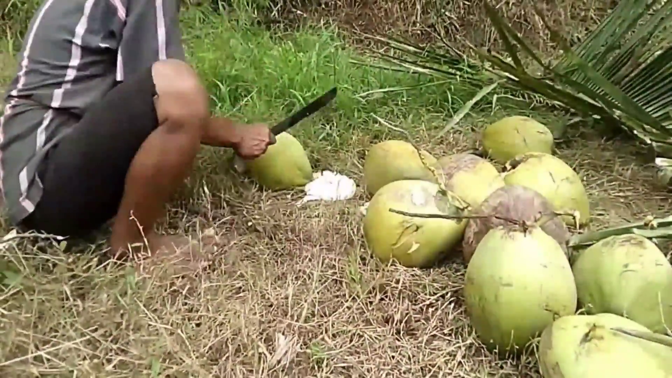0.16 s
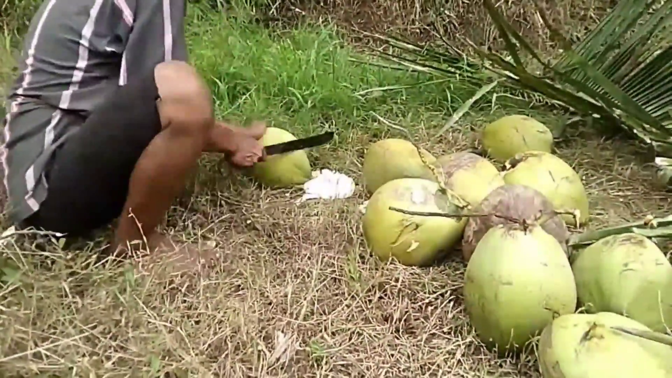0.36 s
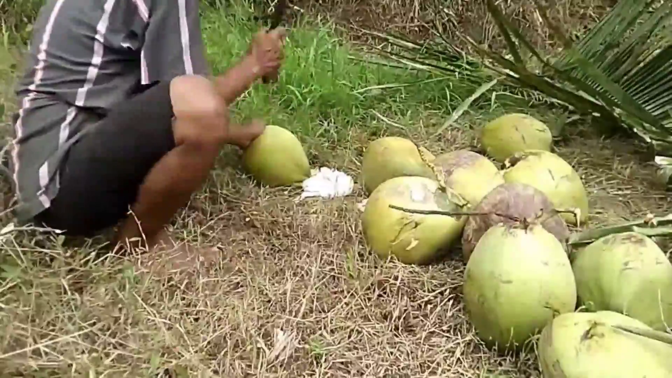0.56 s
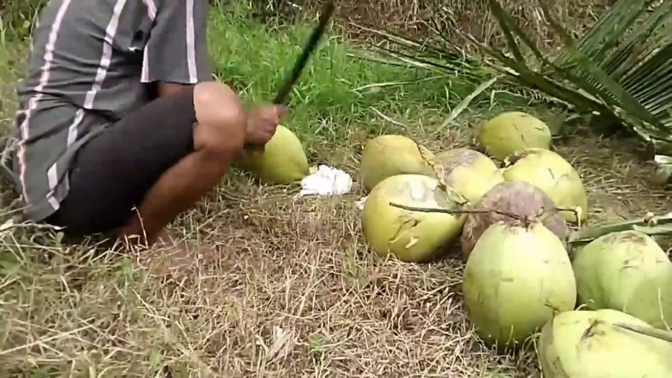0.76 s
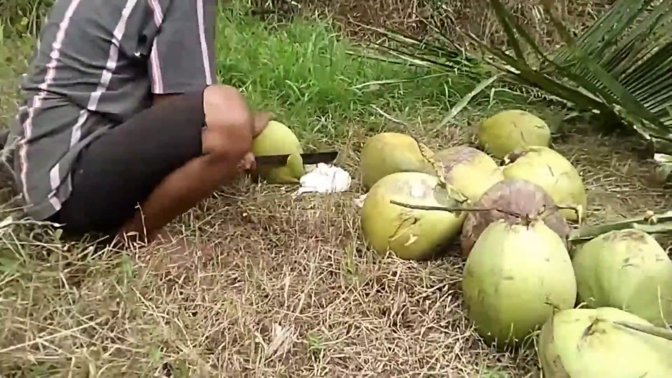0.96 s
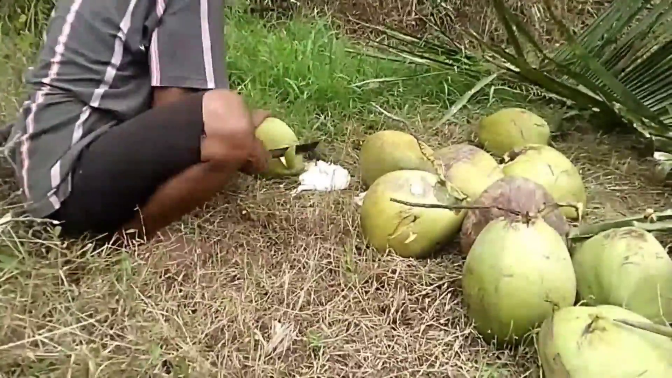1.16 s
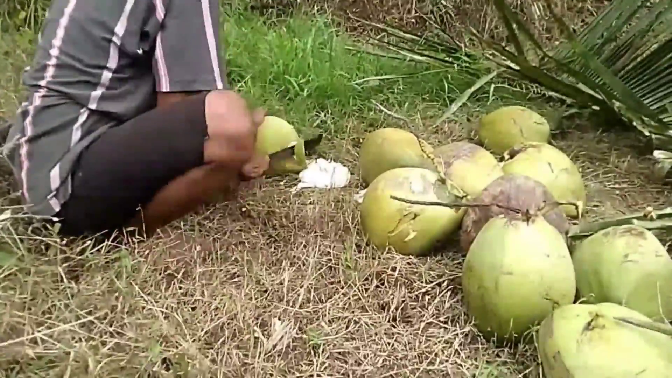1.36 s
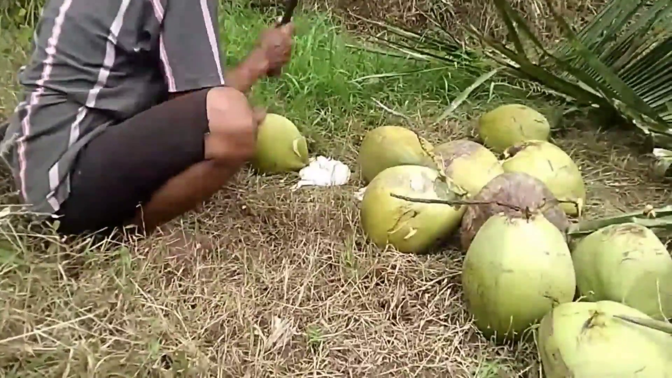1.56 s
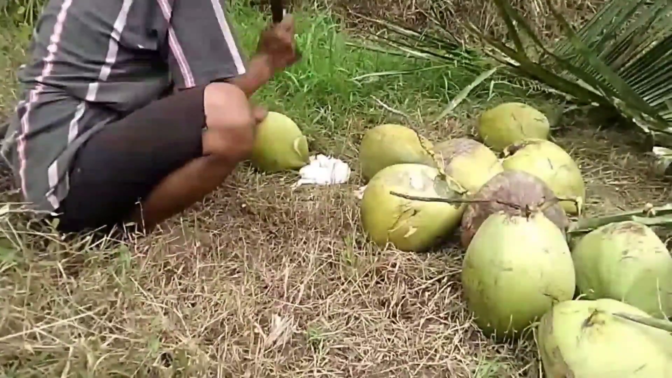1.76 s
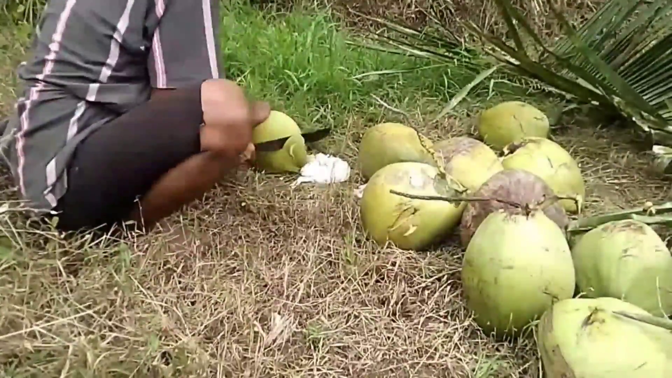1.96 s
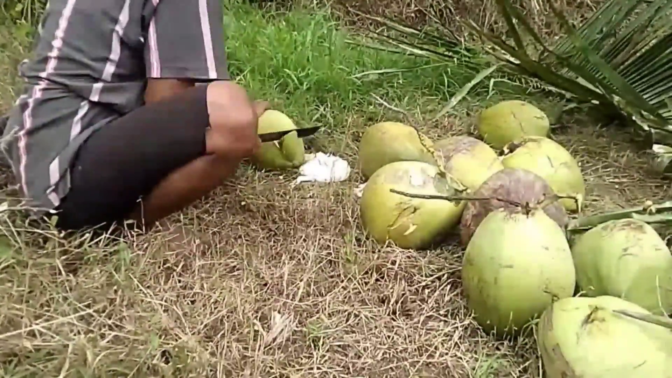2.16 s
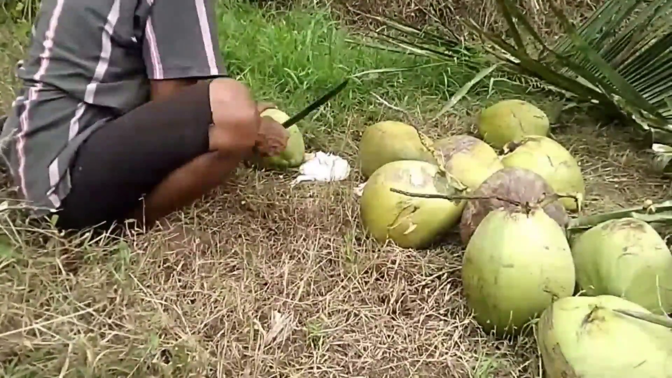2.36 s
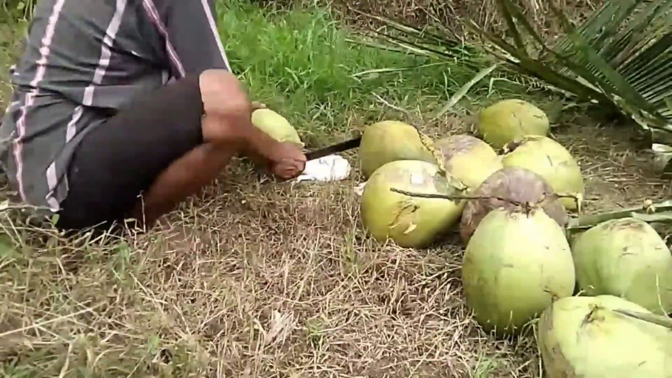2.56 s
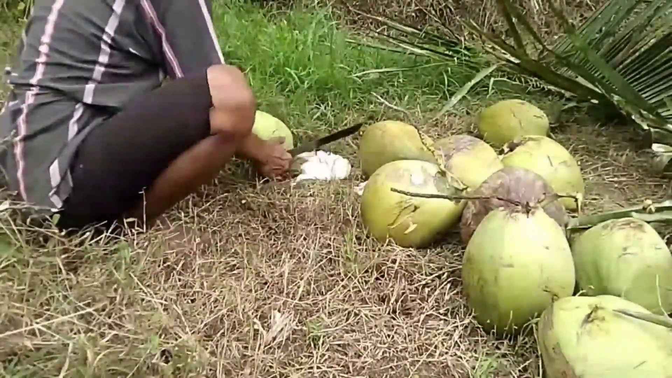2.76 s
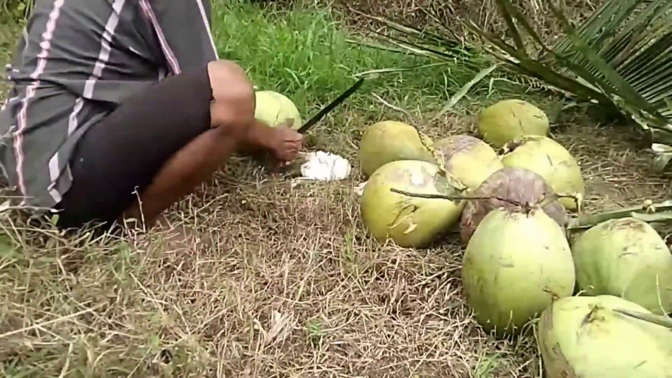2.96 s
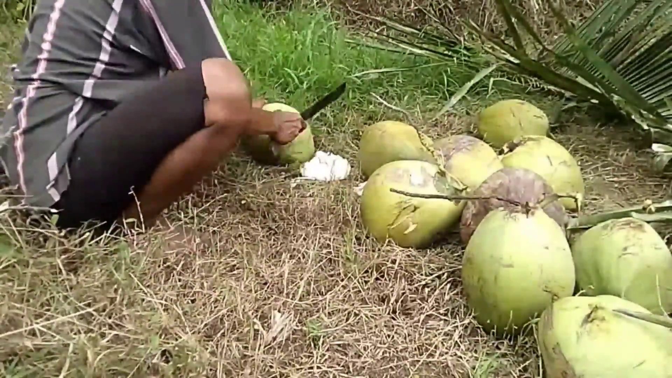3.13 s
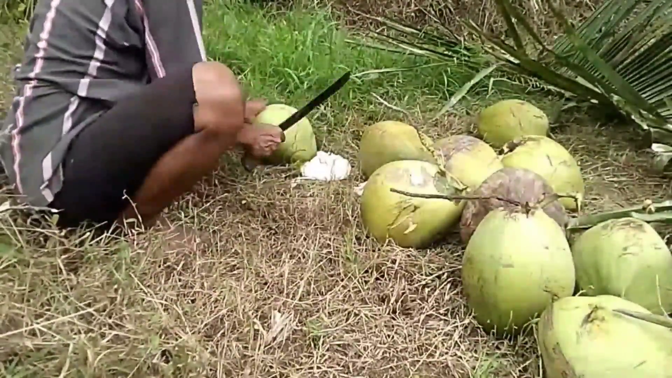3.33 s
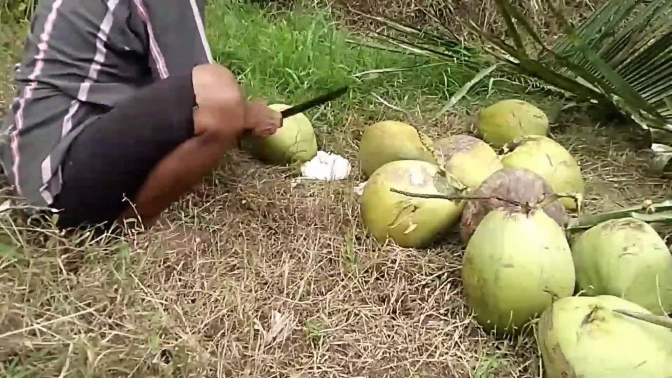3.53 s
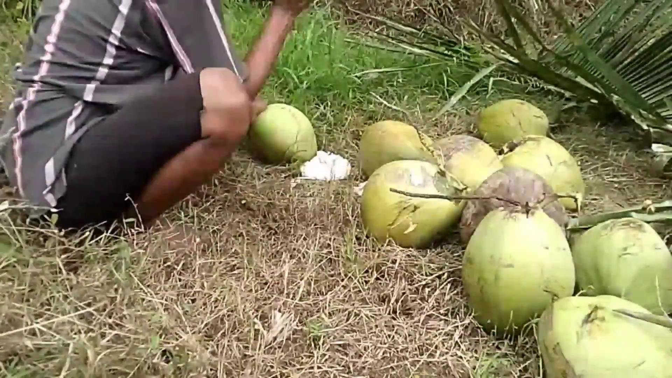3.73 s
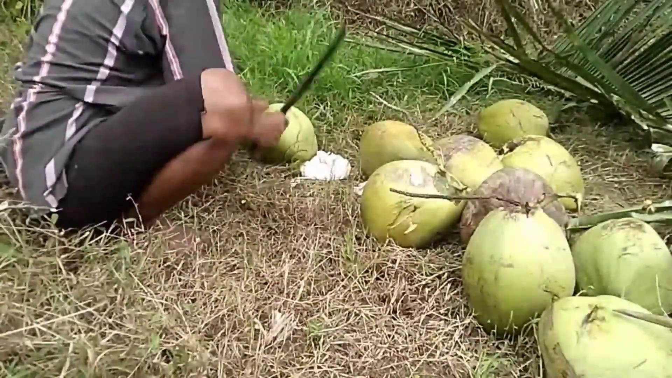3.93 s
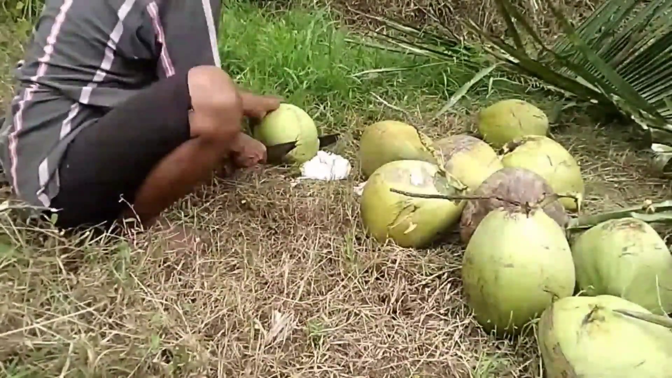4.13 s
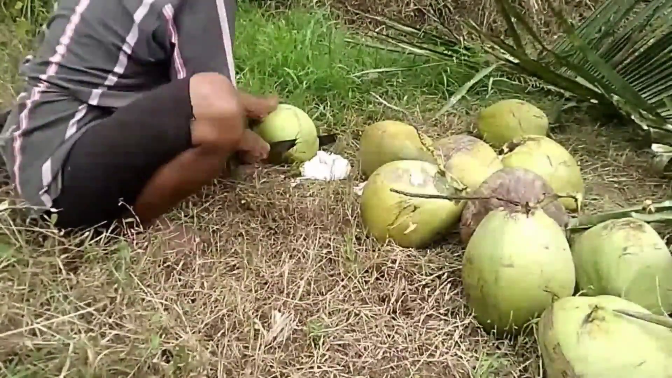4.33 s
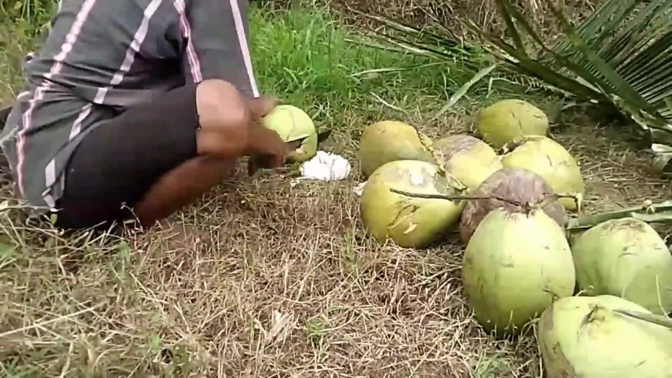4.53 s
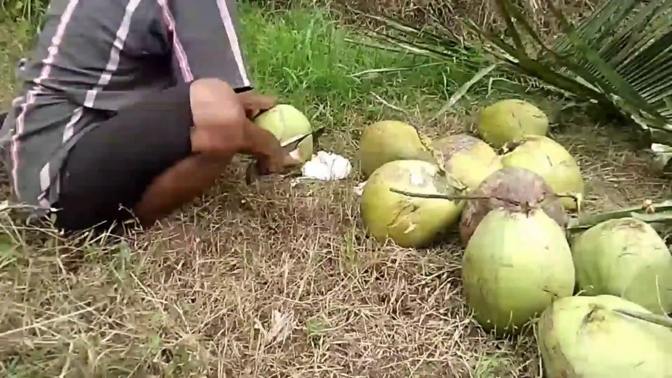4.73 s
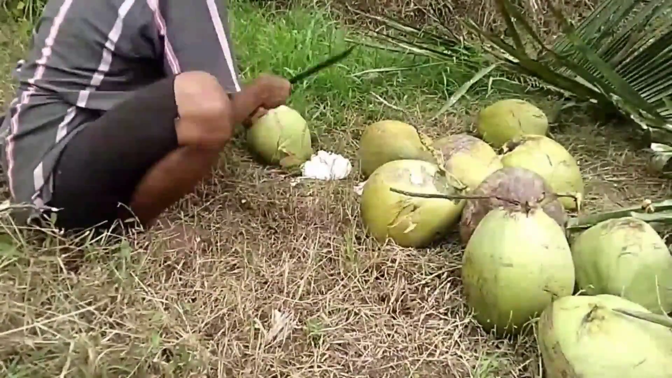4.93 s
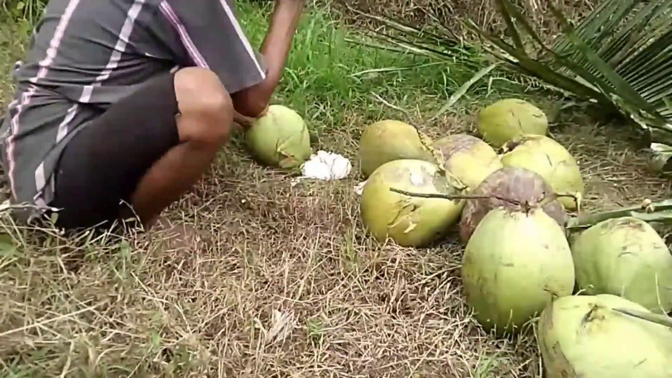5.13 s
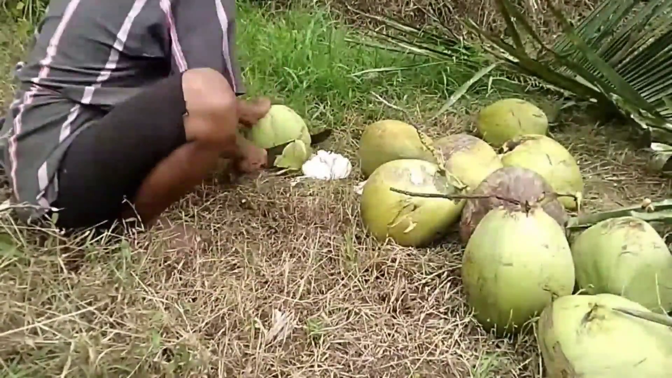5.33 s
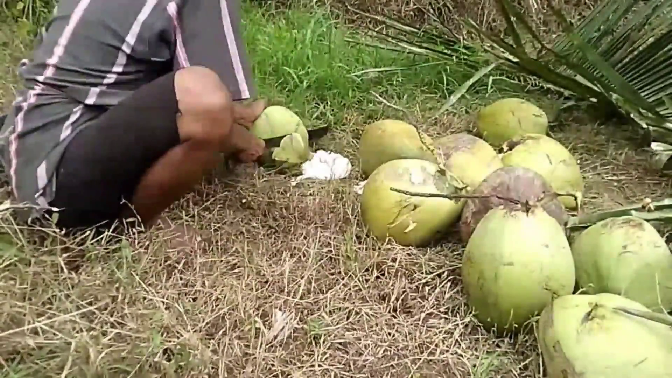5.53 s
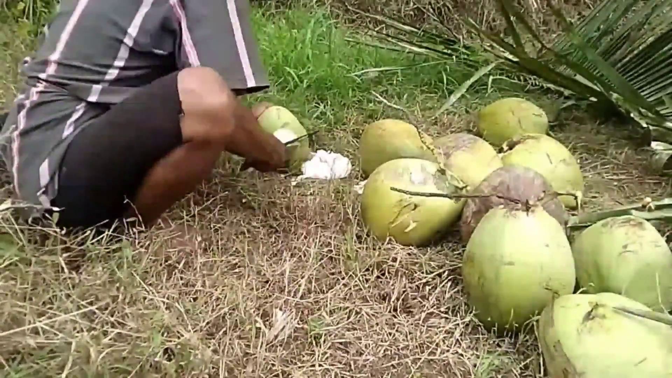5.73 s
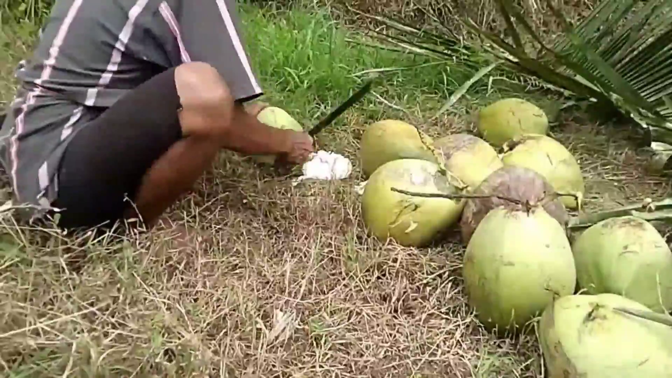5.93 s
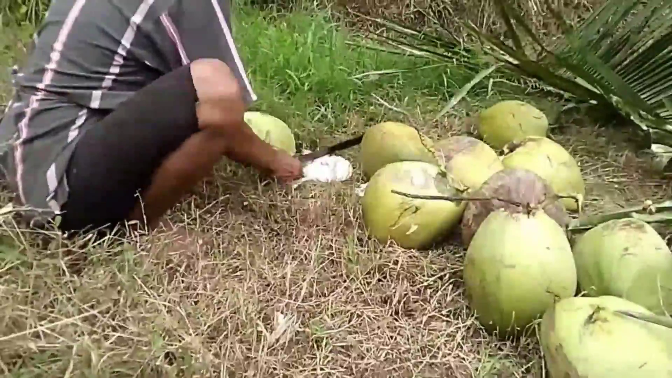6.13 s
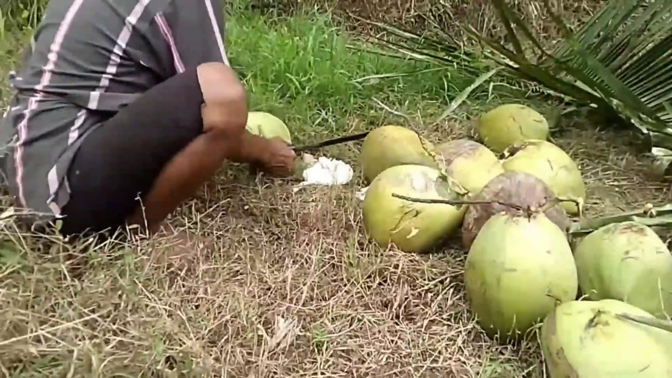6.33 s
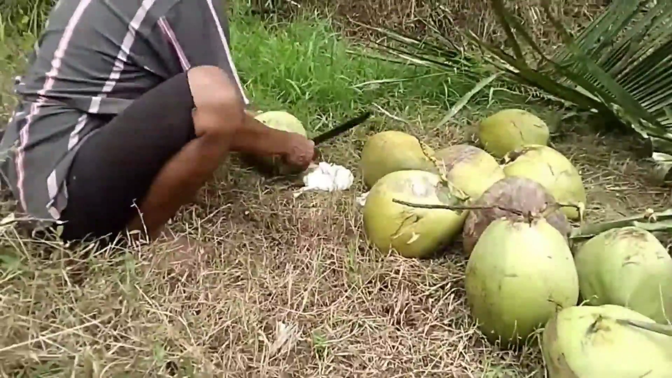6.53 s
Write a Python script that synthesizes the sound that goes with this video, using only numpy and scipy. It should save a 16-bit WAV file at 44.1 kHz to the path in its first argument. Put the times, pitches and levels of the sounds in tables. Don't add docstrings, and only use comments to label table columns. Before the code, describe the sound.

A quiet grassy outdoor place: faint leaf hiss, low wind rumble with small gusts, very high thin insects whining and briefly trilling. A distant bird whistles at 0.3 s. At 0.45 a light blade tap knocks the coconut; at 0.96 a firm chop lands, a dull hollow thud with a bright crack and short crunch, followed by fine tearing around 1.25. Another strong chop hits at 2.0, then fibres rip and snap at 2.3. Fingers bump the nut hollowly around 2.55 to 3.0, with two soft bird notes near 2.8 and gusts till 3.3. A soft blow comes at 3.6, the hardest at 4.1. Around 4.5 to 4.7 the husk is prised, crackling, with a sharp snap at 4.63 and a creak. A small tap at 5.1 precedes the last chop at 5.44, brief tearing at 5.8, a rising whistle at 5.9, and faint taps by 6.4.

```python
import sys
import numpy as np
from scipy import signal
from scipy.fft import rfft, irfft, next_fast_len
from scipy.io import wavfile
from scipy.ndimage import uniform_filter1d

SR = 44100
rng = np.random.default_rng(int(sys.argv[2]) if len(sys.argv) > 2 else 0)


def boost(x):
    u = np.asarray(x, float) / 20
    return 10 ** u


def dump(signal):
    limited = np.clip(np.atleast_2d(signal).T, -1, 1)
    pcm = np.round(limited * 32767).astype(np.int16)
    wavfile.write(sys.argv[1], SR, pcm)


N = 290619

# f/Hz, density/dB per Hz
FIELD_SPECTRUM = [(300, -6), (555, -30.5), (645, -21.5), (1060, -30), (1430, -23), (3000, -25.5),
                  (4100, -26.5), (4700, -20.5), (5900, -21), (7000, -14.5), (10500, -5.5), (13600, -8.5),
                  (15500, -1), (15900, -40.5)]
# t/s, level/dB
FIELD_LEVEL = [(0.0, -62), (0.1, -61.5), (0.3, -66), (1.2, -65), (2.6, -68.5), (2.95, -66), (3.9, -71.5),
               (4.6, -69), (5.4, -71), (6.59, -71)]
# f/Hz, L-R/dB
FIELD_BALANCE = [(60, -18), (110, 9.5), (200, 13), (380, 15), (700, 24), (1290, 16.5), (2380, 26),
                 (4400, 26), (8120, 5), (15000, -0.5)]
# f/Hz, width/Hz, level/dB
CHORUS = [(3465, 180, -74), (4664, 160, -80), (6890, 100, -80.5)]
# f/Hz, density/dB per Hz
RUMBLE_SPECTRUM = [(12, -15), (20, -12.5), (48, -6.5), (123, -1.5), (159, -2), (177, -10.5), (226, -14),
                   (367, -43), (500, -30), (650, -69.5), (1100, -120)]
# t/s, level/dB
WIND_LEVEL = [(0, -68), (.25, -65), (.6, -62.5), (1, -65.5), (1.9, -70), (2.7, -62), (3.05, -62.5),
              (3.28, -57.5), (3.5, -64.5), (4.2, -63.5), (4.6, -66.5), (5, -67.5), (6, -68), (6.59, -65.5)]
# t/s, hold/s, level/dB
GUSTS = [(0.543, 0.012, -58), (0.953, 0.4, -61), (1.567, 0.09, -58.5), (1.983, 0.036, -54.5),
         (2.37, 0.035, -55.5), (2.695, .02, -50.5), (3.185, 0.075, -52), (3.714, 0.09, -71),
         (4.043, 0.039, -67), (4.68, 0.12, -60), (5.463, 0.016, -63), (6.23, .03, -69.5)]
GUST_RISE_DB_PER_S, GUST_FALL_DB_PER_S, CALM_DB = 162, 138, -93.5

# top t/s, period/s, share rising, middle f/Hz, later sink/Hz
WHINES = [(.39, 1.022, .37, 13935, 125), (.63, 1.115, .55, 13950, 0), (.4, 1.055, .45, 13715, 185),
          (.37, 1.035, .45, 13200, 0)]
# first level/dB, last level/dB, fading depth/dB
WHINE_LEVELS = [(-59, -69, 3), (-64, -68, 2.5), (-69, -77, 4), (-82, -77, 4)]
SLIDE_HZ, SINK_S, SINK_LENGTH_S = 80, 3.1, 0.5
SWARM_HZ = [14270, 14180, 14420, 13550, 13750]
SWARM_DB = -77.5
# t/s, hold/s, level/dB
TRILLS = [(1.67, 0.14, -72), (1.943, 0.073, -71), (2.384, 0.0099, -64), (4.236, 0.077, -69.5)]
TRILL_HZ, TRILL_PER_S = 7950, 250
# t/s, hold/s, first f/Hz, last f/Hz, level/dB
WHISTLES = [
    (.31, 0.14, 3273, 3163, -63),
    (2.8, .085, 3343, 3363, -64),
    (2.907, 0.099, 3340, 3324, -58.5),
    (5.926, 0.15, 3270, 3500, -65.5),
]

# t/s, level/dB, f/Hz, t60/s
TAPS = [(0.114, -52.5, 1430, 0.049), (2.544, -49.5, 495, 0.14), (2.655, -42.5, 820, 0.27),
        (2.663, -49, 1670, 0.31), (2.665, -46, 2360, 0.061), (2.699, -46, 90, 0.044),
        (2.704, -44, 1380, 0.013), (2.806, -44.5, 650, 0.24), (2.813, -49, 1230, 0.17),
        (2.983, -51.5, 754, 0.5), (5.09, -60, 1080, 0.02), (5.097, -45.5, 1230, 0.052),
        (5.114, -50.5, 1180, 0.079), (4.25, -53, 980, 0.81), (6.33, -64, 620, 0.56),
        (6.44, -59.5, 667, 0.57)]
# t/s, then low, middle, main and upper ring level/dB
KNOCKS = [
    (0.4422, -33, -38, -73, -65),
    (0.9577, -24.5, -23.5, -21, -43),
    (2.0018, -27.5, -26.5, -11, -31.5),
    (3.595, -60, -35, -60.5, -52.5),
    (4.0904, -27.5, -20.5, -6.5, -23),
    (4.653, -43.5, -43, -68.5, -53),
    (4.689, -51, -38.5, -56, -65),
    (5.433, -27, -23, -12.5, -42),
]
# f/Hz, level/dB, t60/s
NUT_MODES = [
    [(138.5, -17.5, 0.037), (222, -5.5, 0.043), (294, -4, 0.029)],
    [(495.5, -4, 0.062), (575, -15.5, 0.1)],
    [(710, -13, 0.049), (631, -17, .05)],
    [(872, 1, 0.067), (1024, -3, 0.097), (1242, -6, 0.036)],
]
# t/s, level/dB, mid share/dB, body ring/dB, split length/s
CRACKS = [
    (0.446, -32.5, -11, -3.5, 0.0061),
    (0.9651, -13, -10, -2.5, 0.008),
    (2.009, -11, -6, -3, 0.0063),
    (3.6002, -24, -15.5, -6.5, 0.0091),
    (4.098, -9, -2.5, -3.5, 0.0073),
    (5.4409, -12.5, -5.5, -2, 0.008),
]
# f/Hz, level/dB
CRACK_SPECTRUM = [(880, -17.5), (1500, -10.5), (2510, -8), (2880, -9.5), (4500, -3), (5330, -12.5),
                  (6900, -9), (8600, -7), (11100, -7.5), (13400, -15.5), (14600, -9), (16000, -19)]
# f/Hz, level/dB
CRUNCH_SPECTRUM = [(120, -32.5), (200, -12.5), (867, -12), (1000, -9), (1250, -8.5), (4430, -17.5),
                   (8580, -11.5), (12800, -15), (13800, 2.5), (16000, -33)]
CRUNCH_DB, CRUNCH_GROWTH = -32.5, 0.69
# t/s, level/dB, mid share/dB, L-R/dB
SNAPS = [(0.5708, -37, -21, 9), (0.7087, -41, -20, 10), (1.126, -50, -10.5, 26), (1.2, -53, -18, 23),
         (1.237, -52, -14, 2), (1.4246, -43, -18, 5), (1.707, -43.5, -20, 16), (1.8771, -29, -39, -4),
         (2.32, -38, -22, 3.0), (2.342, -28, -11, -5), (2.9115, -44, -12, 16), (3.008, -50.5, -20, 22),
         (4.4913, -39, -12, 1), (4.5237, -33, -17, -16), (4.5813, -35, -5, 7), (4.6307, -17, -29, -8),
         (5.7954, -42, 13, 2), (5.8075, -31.5, 8.5, 5.5)]
# full strain t/s, hold/s, fine level/dB, thick share/dB, creak share/dB
TEARS = [(1.236, 0.019, -51.5, 0.5, -41), (1.273, 0.044, -44.5, -7.5, -25), (2.278, 0.028, -45, -2, -27.5),
         (2.382, 0.0071, -51.5, -11, -18.5), (4.519, 0.024, -58, -4, -45), (4.581, 0.021, -59, 2.5, -46),
         (4.628, 0.017, -37, -14.5, -34), (4.672, 0.048, -45.5, -6, -16.5),
         (5.759, 0.032, -49.5, -7.5, -40), (5.798, 0.0032, -52, 5, -6.5), (5.822, 0.0082, -47, -10, -32),
         (5.868, 0.0029, -51.5, -6.5, -24)]
THICK_MIDDLE_HZ = [4200, 4300, 2920, 3270, 3530, 3330, 3500, 3440, 3300, 3020, 3300, 3340]
# low f/Hz, high f/Hz
THICK_RANGE_HZ = (1700, 5600)
# low f/Hz, high f/Hz
FINE_RANGE_HZ = (7000, 14200)
STRAIN_DB_PER_S, RELEASE_DB_PER_S, CREAK_LAG_S = 308, 299, 0.024

# f/Hz, L-R/dB
PORT_BALANCE = [(60, 4), (200, 6.5), (700, 8.5), (1400, 4.5), (2800, 5.5), (5500, 3), (9000, 2.5),
                (15000, 2.5)]
# f/Hz, phase/rad
PORT_PHASE = [(0, 0), (700, -.35), (1500, -1.4), (3000, -1.2), (6000, -1.7), (10000, -1.9), (16500, -1.7)]
# f/Hz, margin/dB
BLANK_MARGIN = [(900, 19), (2500, 10.5), (3900, 5.5), (6000, 4.5), (8000, 4), (11000, 3), (14000, 5),
                (15100, 30), (15600, 30), (15800, 6)]


def evened(x):
    return x / np.sqrt(np.mean(x ** 2) + 1e-20)


def read(points, hz):
    f, value = np.transpose(points)
    return np.interp(np.log(hz + 1), np.log(f + 1), value)


def curve(rows):
    return np.interp(np.arange(N) / SR, *np.transpose(rows))


def add(mix, s, sound):
    part = mix[..., round(s * SR):][..., :sound.shape[-1]]
    part += sound[..., :part.shape[-1]]


def colour(x, gain):
    size = next_fast_len(x.shape[-1] + 512)
    return irfft(rfft(x, size) * gain(np.fft.rfftfreq(size, 1 / SR)), size)[..., :x.shape[-1]]


def band(x, lo_hz, hi_hz):
    return signal.sosfilt(signal.butter(2, [lo_hz, hi_hz], "bandpass", fs=SR, output="sos"), x)


def drift(per_s, channels=1):
    knots = rng.standard_normal((channels, int(N / SR * 400) + 2))
    knots = uniform_filter1d(knots, max(int(400 / per_s), 1))
    knots = uniform_filter1d(knots, max(int(300 / per_s), 1))
    at = np.arange(N) / SR * 400
    return np.array([np.interp(at, np.arange(len(k)), evened(k)) for k in knots])


def swell(s, hold, rise_db_per_s, fall_db_per_s):
    t = np.arange(N // 32 + 2) * 32 / SR - s
    gain = boost(np.minimum(rise_db_per_s * t, 0) - fall_db_per_s * np.maximum(t - hold, 0))
    return np.interp(np.arange(N) / 32, np.arange(len(t)), gain)


def ports(x):
    def right_gain(hz):
        phase = np.interp(hz, *np.transpose(PORT_PHASE))
        return boost(-0.5 * read(PORT_BALANCE, hz)) * np.exp(-1j * phase)
    left = colour(x, lambda hz: boost(0.5 * read(PORT_BALANCE, hz)))
    return np.array([left, colour(x, right_gain)])


def field():
    def spectrum(hz):
        return boost(read(FIELD_SPECTRUM, hz) + np.array([[0.5], [-0.5]]) * read(FIELD_BALANCE, hz))
    hiss = evened(colour(rng.standard_normal((2, N)), spectrum))
    hiss = hiss * boost(curve(FIELD_LEVEL) + 9 + 1.8 * drift(29))
    chorus = np.zeros((2, N))
    for hz, width_hz, db in CHORUS:
        level = boost(db + 2.0 * drift(10))
        noise = rng.standard_normal((2, N))
        chorus += level * evened(band(noise, hz - width_hz / 2, hz + width_hz / 2))
    return hiss + chorus * boost([[4], [-1.5]])


def wind():
    blowing = boost(CALM_DB)
    for s, hold, db in GUSTS:
        blowing = blowing + boost(db) * swell(s, hold, GUST_RISE_DB_PER_S, GUST_FALL_DB_PER_S)
    left, other, *gusts = rng.standard_normal((4, N))
    hum = np.array([left, 0.75 * left + 0.5 * other])
    hum = evened(colour(hum, lambda hz: boost(read(RUMBLE_SPECTRUM, hz))))
    lumps = boost(4.5 * drift(22, channels=2) + [[-1.5], [2.5]])
    gusts = evened(band(np.array(gusts), 22, 100)) * lumps
    return hum * boost(curve(WIND_LEVEL) + 2 + 2.0 * drift(6.3)) + gusts * blowing * boost(-1.5)


def tone(hz, waver_hz, flutter_db, flutter_per_s):
    turns = np.cumsum(hz + waver_hz * drift(25)[0]) / SR + 0.22 * drift(1.3, channels=2)
    flutter = boost(flutter_db * drift(flutter_per_s, channels=2))
    return np.sqrt(2) * np.sin(2 * np.pi * turns) * flutter


def whine(top, period, rising, middle_hz, sink_hz, first_db, last_db, fading_db):
    t = np.arange(N) / SR
    slide = SLIDE_HZ * signal.sawtooth(2 * np.pi * ((t - top) / period + rising), rising)
    hz = middle_hz + slide - sink_hz * (0.5 + 0.5 * np.tanh((t - SINK_S) / SINK_LENGTH_S))
    level_db = first_db + (last_db - first_db) * t / t[-1] + fading_db * drift(1.4)[0]
    return boost(level_db) * tone(hz, waver_hz=6, flutter_db=3.8, flutter_per_s=45)


def swarm():
    t = np.arange(N) / SR
    out = np.zeros((2, N))
    for hz in SWARM_HZ:
        slide = 90 * signal.sawtooth(2 * np.pi * (t / 1.1 + rng.random()), 0.35)
        level = boost(SWARM_DB - 0.8 * t + 4.0 * drift(2))
        out += level * tone(hz + slide, waver_hz=10, flutter_db=3.5, flutter_per_s=25)
    return out


def trills():
    beats = np.cos(np.pi * np.cumsum(TRILL_PER_S * (1 + 0.09 * drift(56)[0])) / SR) ** 4
    pulses = beats * rng.standard_normal((2, N))
    pulses = evened(band(pulses, 0.94 * TRILL_HZ, 1.06 * TRILL_HZ))
    return pulses * sum(boost(db + 8) * swell(s, hold, 400, 600) for s, hold, db in TRILLS)


def insects():
    near = sum(whine(*habit, *level) for habit, level in zip(WHINES, WHINE_LEVELS))
    return (near + swarm()) * boost([[3.5], [-0.5]]) + trills()


def taps():
    out, t = np.zeros(N), np.arange(4000) / SR
    for s, db, hz, t60 in TAPS:
        puff = rng.standard_normal(len(t)) * boost(-60 * t / t60) * np.clip(t / 0.00062, 0, 1)
        ring = band(puff, 0.74 * hz, 1.07 * hz)
        add(out, s, boost(db - 10.0) * ring / abs(ring).max())
    return out


def bird():
    t = np.arange(N) / SR
    out = np.zeros((2, N))
    for s, hold, first_hz, last_hz, db in WHISTLES:
        glide_hz = np.interp(t, [s, s + hold], [first_hz, last_hz])
        note = tone(glide_hz, waver_hz=14, flutter_db=2.5, flutter_per_s=30)
        out += boost(db) * swell(s, hold, 300, 500) * note
    return out * boost([[4], [-3]])


def nut_ring(group_db, soften_s):
    t = np.arange(5000) / SR
    ring = np.zeros(len(t))
    for g, modes in zip(group_db, NUT_MODES):
        for hz, db, t60 in modes:
            ring -= boost(g + db - 60 * t / t60) * np.sin(2 * np.pi * hz * t)
    return ring * (1 - np.exp(-t / soften_s))


def knocks():
    out = np.zeros(N)
    for s, *group_db in KNOCKS:
        add(out, s - 0.0007, nut_ring(group_db, soften_s=0.0008))
    return band(band(out, 40, 1500), 40, 1500)


def cracks():
    out, t = np.zeros(N), np.arange(8000) / SR
    for s, db, mid_db, body_db, length in CRACKS:
        crunch_db = CRUNCH_DB + (CRUNCH_GROWTH - 1) * db
        split_noise, spikes, crunch_noise = rng.standard_normal((3, len(t)))
        spiky = evened(split_noise * boost(2.0 * uniform_filter1d(spikes, 12) * np.sqrt(12)))
        split = evened(colour(spiky, lambda hz: boost(read(CRACK_SPECTRUM, hz) + mid_db * (hz < 7200))))
        shape = np.clip(t / 0.0014, 0, 1) * boost(-1100 * t - 6000 * np.maximum(t - length, 0))
        crunch = evened(colour(crunch_noise * boost(2.4 * spikes), lambda hz: boost(read(CRUNCH_SPECTRUM, hz))))
        closing = np.clip(t / 0.004, 0, 1) * boost(-40 * t - 190 * np.maximum(t - 0.04, 0))
        add(out, s - 0.0003, boost(db - 6) * (split * shape + boost(crunch_db) * closing * crunch))
        kick = nut_ring([8.5, -4.0, 11.5, -3.5], soften_s=0.00038)
        add(out, s - 0.0002, boost(db + body_db - 16.5) * kick)
    return band(out, 110, 18000)


def snaps():
    out, t = np.zeros((2, N)), np.arange(600) / SR
    for s, db, mid_db, pan_db in SNAPS:
        burst = rng.standard_normal(len(t)) * np.exp(-t / 0.0011)
        snap = band(burst, 7000, 15000) + boost(mid_db + 6) * band(burst, 2200, 5500)
        pan = boost(np.array([[0.5], [-0.5]]) * (pan_db + 9.5))
        add(out, s + 0.001, boost(db - 4.5) * ports(snap) * pan)
    return out


def fibres(pitch_hz, per_s, spread_db, cycles, clump_db, tilt=0, middle_hz=None):
    size = boost(spread_db * np.minimum(rng.exponential(1, N), 4)) * (rng.random(N) < per_s / SR)
    size *= boost(clump_db * drift(70)[0])
    pitches = np.geomspace(*pitch_hz, num=16)
    kind, out = rng.integers(0, 16, N), np.zeros(N)
    if middle_hz is not None:
        size *= boost(-20 * np.log2(pitches[kind] / middle_hz) ** 2)
    for k, hz in enumerate(pitches):
        r, turn = np.exp(-hz / cycles / SR), 2 * np.pi * hz / SR
        gain = np.sin(turn) ** tilt * (1 - r) ** 0.5
        out += signal.lfilter([0, gain], [1, -2 * r * np.cos(turn), r * r], size * (kind == k))
    return evened(out)


def tears():
    middle_hz = np.interp(np.arange(N) / SR, [row[0] for row in TEARS], THICK_MIDDLE_HZ)
    fine = fibres(FINE_RANGE_HZ, per_s=6000, spread_db=2.5, cycles=4.5, clump_db=1.3, tilt=0.37)
    thick = fibres(THICK_RANGE_HZ, per_s=3500, spread_db=3.5, cycles=4.5, clump_db=2.6, tilt=1,
                   middle_hz=middle_hz)
    thick = evened(band(band(thick, 1980, 10400), 1980, 10400))
    creak = fibres((450, 2000), per_s=900, spread_db=5.0, cycles=1.5, clump_db=3.0, tilt=1.0)
    out = np.zeros(N)
    for s, hold, db, thick_db, creak_db in TEARS:
        strain = boost(db) * swell(s, hold, STRAIN_DB_PER_S, RELEASE_DB_PER_S)
        late_strain = np.roll(strain, round(CREAK_LAG_S * SR))
        out += strain * (fine + boost(thick_db) * thick) + boost(creak_db) * late_strain * creak
    return out


def grass(x):
    t = np.arange(300) / SR
    echoes = band(rng.standard_normal((2, len(t))) * np.exp(-t / 0.0025), 1500, 16000)
    return signal.oaconvolve(x[None], echoes / np.linalg.norm(echoes[0]), axes=1)[:, :N]


def scene():
    background = field() + wind() + insects() + bird()
    nut = taps() + knocks() + cracks() + tears()
    return background + ports(nut) + boost(-9) * grass(nut) + snaps()


def starved(x, scatter_db):
    hz, _, z = signal.stft(x, SR, nperseg=1536, noverlap=1024)
    power = (abs(z[:, :768]) ** 2).mean(0).reshape(96, 8, -1).mean(1)
    level_db = 10 * np.log10(power + 1e-20)
    whim = evened(uniform_filter1d(rng.standard_normal(power.shape), size=9))
    treble_db = level_db[9:67].mean(0)
    treble_db -= 2 * np.maximum(treble_db - np.median(treble_db) - 15, 0)
    margin_db = read(BLANK_MARGIN, hz[4:768:8])[:, None]
    under_db = treble_db - level_db + scatter_db * whim - margin_db
    keep = np.clip(0.5 - under_db, 0.02, 1)
    keep[:3] = 1
    z[:, :768] *= np.repeat(keep, 8, axis=0)
    return signal.istft(z, SR, nperseg=1536, noverlap=1024)[1][:, :N]


def top_cut(x):
    return signal.sosfilt(signal.butter(12, 16810, fs=SR, output="sos"), x)


def record(dry):
    limit = [(15400, 0), (15900, -14), (16600, -20), (16900, -80)]  # f/Hz, gain/dB
    limited = colour(dry, lambda hz: boost(read(limit, hz)))
    thinned = starved(limited, scatter_db=4.5)
    return top_cut(thinned)


dry = scene()
out = record(dry)
dump(out)
```